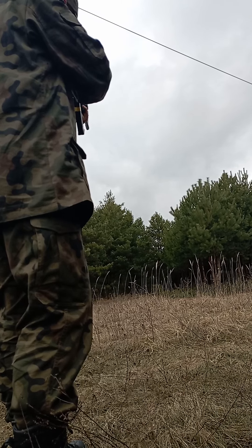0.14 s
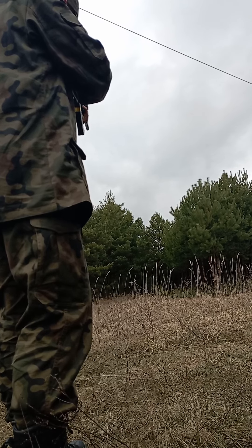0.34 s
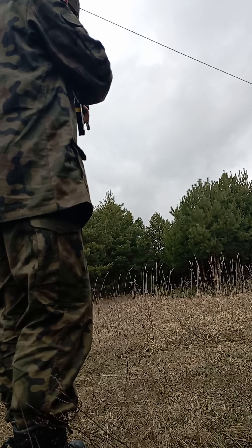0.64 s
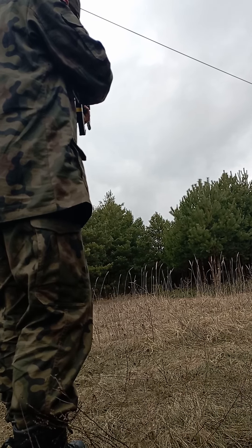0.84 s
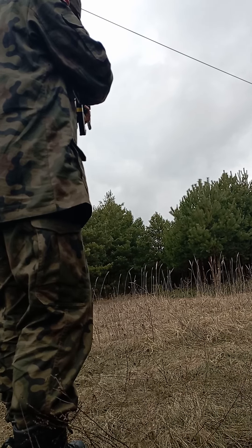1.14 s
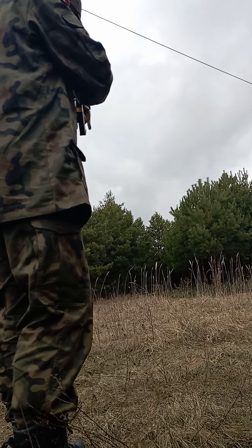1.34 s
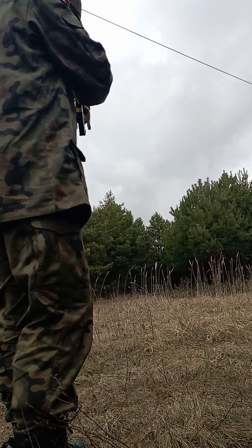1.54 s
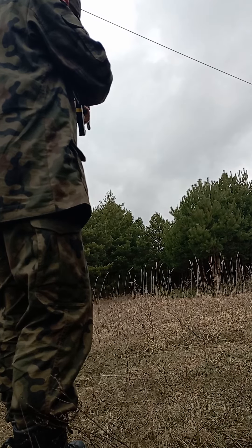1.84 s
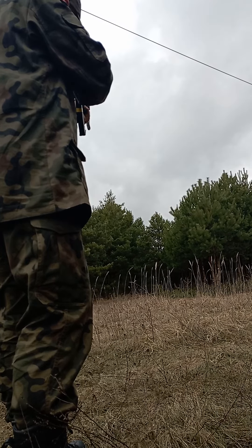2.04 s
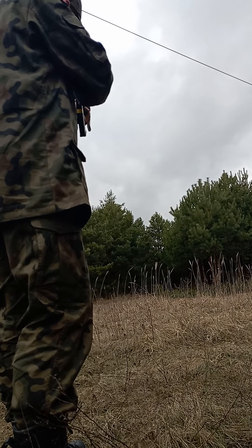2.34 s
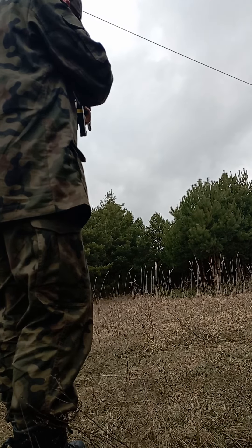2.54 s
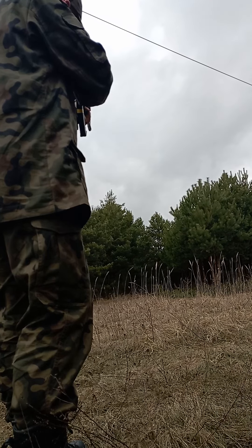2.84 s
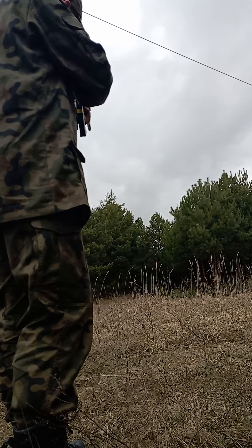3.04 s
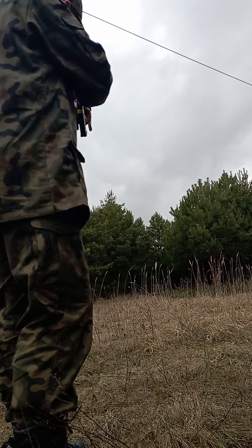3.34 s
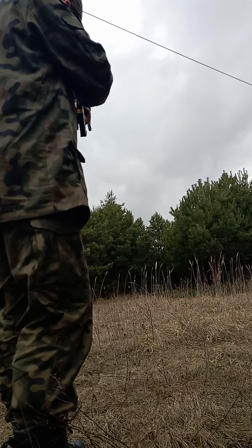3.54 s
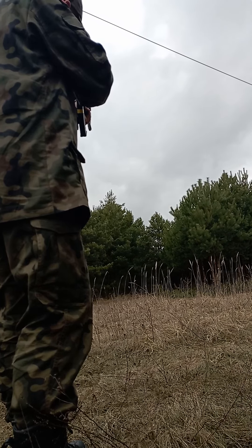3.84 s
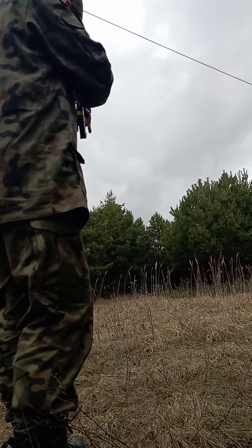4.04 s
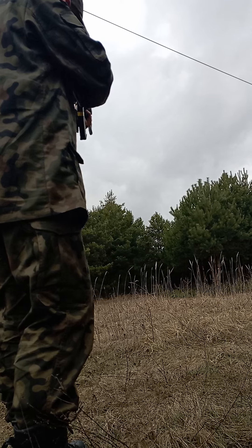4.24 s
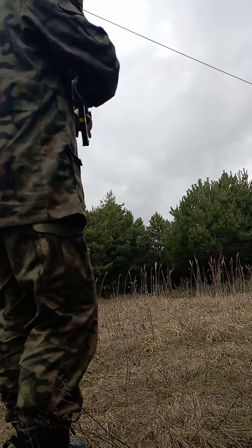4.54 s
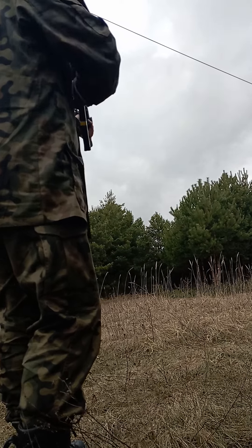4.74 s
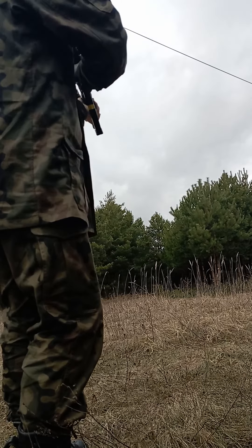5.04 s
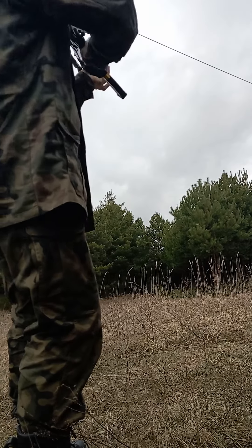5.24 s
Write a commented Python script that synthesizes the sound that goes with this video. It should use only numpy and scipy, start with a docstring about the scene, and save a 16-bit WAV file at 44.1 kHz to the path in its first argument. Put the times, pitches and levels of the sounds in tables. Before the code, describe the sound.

Outdoors in an open field, an electric airsoft rifle starts firing at once, about ten sharp snapping shots a second for four seconds, with hollow piston knocks, gear rattle and motor whine between them. It stops abruptly with a very short rundown. Then soft breeze, faint cloth rustle, tiny gear ticks and two dull boot thuds. Close stereo phone microphone on the shooter's side.

```python
"""In an open field an electric airsoft rifle fires one long burst, ten shots a second, heard from the shooter's side.
Air cracks and jets from the muzzle as filtered clicks and short noise; piston blows set the body ringing.
Random tooth clicks, a drone and a whine follow the spring load, then the motor runs down.
Shaped noise makes the breeze, far rumble, cloth and small ticks of kit; soft low rings are boots shifting.
Two phone microphone ports, each with its own colour, pick it all up."""
import sys
import numpy as np
from scipy import signal
from scipy.fft import rfft, irfft, next_fast_len
from scipy.io import wavfile

SR = 44100
rng = np.random.default_rng(int(sys.argv[2]) if len(sys.argv) > 2 else 0)


def unload_wav(signal):
    """Save mono or channel-first audio to the path in sys.argv[1] as 16-bit WAV at rate SR, clipped to [-1, 1]."""
    wavfile.write(
        sys.argv[1],
        SR,
        np.round(np.clip(np.atleast_2d(signal).T, -1, 1) * 32767).astype(np.int16),
    )


N = 238111
TIME = np.arange(N) / SR   # s

# The shots of the burst: t/s, relative level/dB
SHOTS = [(0.0179, -1.4), (0.1256, -2.9), (0.2251, -5.0), (0.3241, -3.9), (0.4226, -3.9), (0.5209, -3.2),
         (0.6195, -2.9), (0.718, -4.6), (0.8169, -5.2), (0.9161, -3.3), (1.0154, -3.7), (1.115, -2.4),
         (1.2146, -2.6), (1.3145, -2.1), (1.4147, -3.4), (1.515, -1.9), (1.6156, -2.5), (1.7163, -2.1),
         (1.8177, -4.3), (1.919, -2.8), (2.0202, -2.6), (2.1215, -2.2), (2.2226, -2.9), (2.3238, -3.8),
         (2.4243, -5.2), (2.5253, -2.5), (2.6264, -4.4), (2.7272, -2.5), (2.8292, -3.0), (2.931, -2.4),
         (3.0325, -2.5), (3.1341, -2.7), (3.2359, -2.6), (3.3377, -2.1), (3.4392, -3.1), (3.5408, -2.8),
         (3.6426, -3.8), (3.7439, -3.2), (3.8461, -3.9), (3.95, -3.8)]
# Tone of fine cloth hiss and kit ticks: f/Hz, relative level/dB
FINE_COLOUR = [(4000, -32), (6000, -5), (8000, -4), (10000, 0), (11500, -8.5), (14500, -13), (16000, -31.5)]
RIGHT_LAG = 8   # samples by which gearbox sound reaches the right port later


def amp(db):
    """Turns decibels into a plain multiplier."""
    return 10 ** (np.asarray(db) / 20)


def rms_one(x):
    """Scales a sound to an average (rms) strength of 1."""
    return x / np.sqrt(np.mean(x ** 2) + 1e-20)


def clicks(times, gains):
    """Clicks at exact times, even between samples: each is a short, smoothly ended sinc pulse."""
    at = np.ravel(times)[:, None] * SR
    index = np.floor(at).astype(int) + np.arange(-12, 13)
    offset = index - at
    taps = np.sinc(offset) * np.cos(np.pi * offset / 27) ** 2
    out = np.full(N, 1e-18)   # not quite zero, which keeps later filters fast
    inside = (index >= 0) & (index < N)
    np.add.at(out, index[inside], (taps * np.ravel(gains)[:, None])[inside])
    return out


def ring(x, hz, t60):
    """A resonance: a unit click starts a sine of height 1 that dies by 60 dB in t60 seconds."""
    r, w = amp(-60 / (t60 * SR)), 2 * np.pi * hz / SR
    return signal.lfilter([0, np.sin(w)], [1, -2 * r * np.cos(w), r * r], x)


def coloured(x, spectrum):
    """Shapes the tone of a steady sound by a curve of f/Hz, level/dB, then sets its rms to 1."""
    size = next_fast_len(N)
    hz, db = np.transpose(spectrum)
    grid = np.log(np.arange(size // 2 + 1) * SR / size + 1)
    curve = amp(np.interp(grid, np.log(hz), db, left=-80))
    return rms_one(irfft(rfft(x, size) * curve, size)[..., :N])


def pair(alike):
    """Stereo noise: the ports share this part of its power and the rest differs."""
    a = np.clip(alike, 0, 1)
    shared, left, right = rng.standard_normal((3, N))
    return np.sqrt(a) * shared + np.sqrt(1 - a) * np.array([left, right])


def wobble(rate_hz):
    """Random wandering with rms 1, smoothed by a low-pass filter at rate_hz."""
    smooth = signal.butter(2, rate_hz, fs=SR, output="sos")
    return rms_one(signal.sosfilt(smooth, rng.standard_normal(N + SR))[SR:])   # drops the filter's start


def rough_line(hz, width_hz):
    """A rough tone: a narrow band of noise around a steady or moving pitch."""
    turn = 2 * np.pi * np.cumsum(hz * np.ones(N)) / SR
    return wobble(width_hz) * np.cos(turn) + wobble(width_hz) * np.sin(turn)


def lagged(x, count=RIGHT_LAG):
    """Makes two channels and delays the right one by count samples."""
    x = x * np.ones((2, 1))
    return np.array([x[0], np.roll(x[1], count)])


def port(x, peaks):
    """Colours one channel by boosting or cutting bands in turn: f/Hz, width/Hz, level/dB."""
    for hz, width, db in peaks:
        w, a = 2 * np.pi * hz / SR, amp(db / 2)
        k = np.sin(w) * width / hz / 2
        x = signal.lfilter([1 + k * a, -2 * np.cos(w), 1 - k * a], [1 + k / a, -2 * np.cos(w), 1 - k / a], x)
    return x


def muzzle_crack():
    """The sharp crack of escaping air reaches each port directly and off nearby surfaces."""
    # Arrival times around the shot, one row a path: left t/s, right t/s
    path_delays = [(-.0006, -.00052), (-.00021, -.00021), (-.0001, -.00006), (.00057, .0005),
                   (.00167, .0015), (.002, .0019), (.0197, .02)]
    # Strength of the same paths: left level/dB, right level/dB
    path_levels = [(-10, -16), (3.5, -10), (.5, 1), (-11, -16), (-1, -7), (-5, -14), (-22, -34)]
    s, db = np.transpose(SHOTS)
    delays, levels = np.transpose(path_delays), np.transpose(path_levels)
    vary_db = 1.0 * rng.standard_normal((len(s), len(path_delays)))
    cracks = [clicks(s[:, None] + delays[c], amp(db[:, None] + levels[c] + vary_db - 0.5)) for c in (0, 1)]
    band = signal.butter(2, [3720, 14500], "band", fs=SR, output="sos")   # Hz
    return signal.sosfilt(band, cracks)


def air_jet():
    """Air jets past the pellet: noise swells sharply at each crack, holds briefly and falls."""
    # Tone of the jet: f/Hz, relative level/dB
    jet_colour = [(800, -22), (1800, 3), (3000, 3), (5500, -15.5), (7000, 12.5), (8000, 8), (10000, 6.5),
                  (13000, -3), (17000, -10.5)]
    jet_db, start_s, end_s = -24, -0.003, 0.0012   # full level between these times from the crack
    rise_db_per_s, fall_db_per_s = 15989.5, 3996.5
    s, db = np.transpose(SHOTS)
    nearest = np.searchsorted((s[1:] + s[:-1]) / 2, TIME)
    since = TIME - s[nearest]
    rise_db = rise_db_per_s * np.maximum(start_s - since, 0)
    fall_db = fall_db_per_s * np.maximum(since - end_s, 0)
    gate = amp(jet_db + .5 * db[nearest] - rise_db - fall_db)   # jets vary half as much in dB as shots
    return lagged(gate * coloured(pair(alike=0.91), jet_colour), count=7)


def barrel():
    """The barrel's column of air rings like a blown pipe."""
    s, db = np.transpose(SHOTS)
    return ring(clicks(s - .0006, amp(db - 25)), 2186, 0.016)   # Hz, t60 s


def echo():
    """Grass and ground scatter treble back: each shot starts a dying tail of noise."""
    # Tone of the echo: f/Hz, relative level/dB
    echo_colour = [(2500, -32), (5500, -10), (7500, 3.5), (10000, 3), (13000, -5.5), (14800, -10),
                   (16000, -40)]
    echo_db, t60_s = -41, 0.29
    s = np.array(SHOTS)[:, 0]
    fired = np.zeros(N)
    fired[((s + .004) * SR).astype(int)] = 1
    power = signal.lfilter([1], [1, -amp(-120 / (t60_s * SR))], fired)   # overlapping tails add as power
    return amp(echo_db) * np.sqrt(power) * coloured(pair(alike=0.39), echo_colour)


def muzzle():
    """Crack and jet share a resonant tone towards each port; the echo and barrel ring join them."""
    # Muzzle resonances, a list for the left port and one for the right: f/Hz, width/Hz, level/dB
    muzzle_ring = [
        [(9870, 2900, 5), (6750, 940, 4)],
        [(6874, 630, 6), (10200, 2100, 3)],
    ]
    shot = air_jet() + muzzle_crack()
    return np.array([port(shot[c], muzzle_ring[c]) for c in (0, 1)]) + lagged(echo() + barrel())


def piston():
    """Release, flight, slam and pick-up ring the plastic body and shove the whole rifle."""
    # Blows in the gearbox: t/s from crack, knock direction, knock level/dB, shove direction, shove level/dB
    blows = [(-.0141, -1, -39, -1, -33.5), (-.0109, 1, -38.5, 1, -33.5), (-.0073, -1, -38, -1, -41.5),
             (-.0031, -1, -38, 1, -40), (.0016, 1, -28.5, -1, -46), (.0037, 1, -30, 1, -40),
             (.0245, 1, -43, 1, -60), (.040, 1, -44, 1, -58)]
    # Resonances of the body: f/Hz, level/dB added to the knock, t60/s
    body = [(339, -8.5, .029), (420, -8, .033), (517, -9.5, .035), (560, 0, .028), (890, -9.5, .021),
            (706, -17, .03), (1500, -16, .015), (2150, -14, .012)]
    s = np.array(SHOTS)[:, :1]
    delay, knock_sign, knock_db, shove_sign, shove_db = np.transpose(blows)
    fired = np.ones((len(s), len(delay)))
    fired[-1, delay > .02] = 0   # the trigger is let go: no pick-up after the last shot
    times = s + delay + .00008 * rng.standard_normal(fired.shape)
    out = ring(clicks(times, fired * shove_sign * amp(shove_db)), 85, .054)   # recoil: Hz, t60 s
    for hz, db, t60 in body:
        vary_db = 0.48 * rng.standard_normal(fired.shape)
        out += ring(clicks(times, fired * knock_sign * amp(knock_db + db + vary_db)), hz, t60)
    return lagged(out)


def tooth_rattle():
    """Gear teeth clatter: random clicks and noise, with one band that sings."""
    # Tone of the rattle: f/Hz, relative level/dB
    rattle_colour = [(700, -3.5), (1200, 0), (2000, -7), (3000, 6), (4500, 5), (6000, 0.5), (8500, 1),
                     (11000, -4), (12200, -3), (14800, -11.5), (16000, -42.5)]
    # Extra treble at the left port, which faces the gearbox: f/Hz, width/Hz, level/dB
    left_treble = [(8700, 6800, 3)]
    hits = rng.random(N) < 2500 / SR   # average hits per second
    hit_db = 1.6 * np.minimum(rng.exponential(1, N), 4)
    teeth = hits * amp(hit_db) * rng.choice([-1, 1], N)
    rattle = coloured(rms_one(teeth) + 1.55 * pair(alike=0.13), rattle_colour)
    rattle = np.array([port(rattle[0], left_treble), rattle[1]])
    return rattle + amp(-10) * rough_line(4620, 110)


def gearbox_drone():
    """Low noise with rough tones where the gearbox shell resonates."""
    # Tone of the drone: f/Hz, relative level/dB
    drone_colour = [(40, -31), (110, -2), (250, -20.5), (400, -10.5), (520, -2.5), (680, -10), (950, -15),
                    (1300, -12), (2200, -12.5), (4000, -45)]
    # Shell resonances: f/Hz, width/Hz, level/dB over the drone
    hums = [(442, 34, -8), (562, 25, -7), (950, 47, -9)]
    drone = coloured(pair(alike=1.0), drone_colour)
    return drone + sum(amp(db) * rough_line(hz, width) for hz, width, db in hums)


def gear_whine(load):
    """Pairs of gears whine together; a loaded spring slows them and lowers the pitch."""
    # Gear pairs: multiple of the whine's pitch, level/dB
    whine_orders = [(1, -3), (1.549, -11), (2.299, -11)]
    free_hz, sag_hz, sag_bend = 1976, 433.4, 1.5   # unloaded pitch, its drop towards full load, bend of the drop
    lag_s, width_hz = .004, 160   # the motor answers the load a little late
    r = np.exp(-1 / (lag_s * SR))
    whine_hz = free_hz - sag_hz * signal.lfilter([1 - r], [1, -r], load ** sag_bend)
    return sum(amp(db) * rough_line(k * whine_hz, k * width_hz) for k, db in whine_orders)


def gears():
    """The spring's load, the catch and the release steer rattle, drone and whine until the gears coast and stop."""
    pick_up, let_go = .24, .87   # shares of the cycle after the crack at which the gear catches and frees the piston
    s = np.array(SHOTS)[:, 0]
    cycle_times = np.r_[2 * s[0] - s[1], s, 2 * s[-1] - s[-2]]
    share = np.interp(TIME, cycle_times, np.arange(len(s) + 2)) % 1
    period = np.mean(np.diff(s))
    after = TIME - s[-1]
    pulling = (share > pick_up) & (share < let_go) & (after < 0)
    load = pulling * (share - pick_up) / (let_go - pick_up)
    # the teeth clatter as they catch the piston: 4 dB more, fading over about 2.6 ms
    catch_db = 4 * pulling * np.exp(-np.abs(share - pick_up) * period / 0.0026)
    # the rattle changes with load, while free, and while the piston flies
    rattle_db = -40.5 - 5 * load + catch_db - 1.5 * ~pulling - 6 * (share > let_go)
    drone_db = -48 - 2.5 * load
    whine_db = -54 + 7 * np.minimum(load / .4, 1) + catch_db   # full gain from 0.4 of full load
    # after the last shot the gears coast for 0.11 s, then stop: dB per second
    slowing_db = -47 * after - 245 * np.maximum(after - .11, 0)
    rattle_db = np.where(after > 0, -47 + slowing_db, rattle_db)
    drone_db = np.where(after > 0, -51.5 + slowing_db, drone_db)
    whine_db = np.where(after > 0, -64 + slowing_db, whine_db)
    rattle = amp(rattle_db + 2.26 * wobble(60)) * tooth_rattle()
    return lagged(rattle + amp(drone_db) * gearbox_drone() + amp(whine_db) * gear_whine(load))


def kit_ticks():
    """Bits of kit tick: each tick is a brief burst of bright hiss, with fainter ones at random."""
    # Single ticks: t/s, level/dB, left over right/dB
    kit = [(4.3296, -60, -0.5), (4.3424, -60, -6), (4.3545, -58, 4.5), (4.3614, -57, 0.5),
           (4.3774, -63, -1.0), (4.3984, -63, 0.5), (4.4418, -60, -2.0), (4.4997, -67, -1.0),
           (4.581, -53, 2), (4.6488, -61, 0.5), (4.7084, -62, -2.0), (4.7671, -58, -1.0),
           (4.999, -60.5, 0.5), (5.0274, -71, 0.0), (5.2689, -50, 1.0), (5.3165, -41.5, 2),
           (5.3507, -46, 0.0)]
    s, db, pan = np.transpose(kit)
    chance = (rng.random(N) < 18 / SR) * (TIME > 4.2)   # average per second; from 4.2 s on
    small = chance * amp(-69 + 3.0 * rng.standard_normal(N))
    taps = [clicks(s, amp(db + side * pan / 2)) + small for side in (1, -1)]
    fading = signal.lfilter([1], [1, -amp(-60 / (0.0058 * SR))], taps)   # t60 5.8 ms
    return fading * coloured(pair(alike=0.3), FINE_COLOUR)


def cloth():
    """Sleeves rub: each rub swells and fades as a fine hiss and a coarse rasp, with stiff fibres snapping."""
    # Rubs: peak t/s, hiss level/dB, rasp level/dB, swell/(dB/s), fade/(dB/s), both for the hiss
    rubs = [(4.36, -76, -80, 330, 170), (4.61, -68, -69, 150, 500), (5.35, -62, -66, 80, 70)]
    # Tone of the coarse rasp: f/Hz, relative level/dB
    rasp_colour = [(1200, -23), (2500, -7), (3800, 4), (4800, -3), (6000, -17), (8000, -31.5)]
    s, fine_db, rasp_db, swell, fade = np.transpose(rubs)[:, :, None]
    shape_db = -np.maximum((s - TIME) * swell, (TIME - s) * fade)
    snaps = rng.random(N) < 400 / SR   # average per second
    crackle = rms_one(snaps * rng.standard_normal(N))
    # the first levels remain between rubs: cloth never lies quite still
    fine = amp(-84.5) + amp(fine_db + shape_db).sum(axis=0)
    rasp = amp(-87) + amp(rasp_db + shape_db / 1.5).sum(axis=0)   # the rasp changes 1.5 times as slowly
    out = 0
    for level, colour in ((fine, FINE_COLOUR), (rasp, rasp_colour)):
        flutter = amp(1.8 * wobble(40))
        out = out + level * flutter * coloured(pair(alike=0.078) + .6 * crackle, colour)
    return (TIME > SHOTS[-1][0]) * out   # only after the last shot


def boot_thuds():
    """Boots shift: soft low thuds that ring briefly."""
    # Thuds: t/s, level/dB
    thuds = [(4.969, -39.5), (5.055, -43.5)]
    s, db = np.transpose(thuds)
    return ring(clicks(s, amp(db)), 90, 0.067)


def breeze():
    """Gusty air and far rumble: noise that the two ports share mostly in the bass."""
    # Tone of the air: f/Hz, relative level/dB
    air_colour = [(18, -47.5), (30, -14.5), (81, -7.5), (109, -4.5), (184, -8), (311, -12), (355, -12.5),
                  (540, -20), (684, -19.5), (801, -23.5), (1100, -23.5), (2170, -32.5), (2750, -37.5),
                  (16000, -63.5)]
    # Gusts: t/s, level/dB
    gusts = [(0, -59), (4.2, -58), (4.6, -56.5), (4.85, -59), (5.15, -56.5), (5.4, -56.5)]
    low = signal.butter(1, 900, fs=SR, output="sos")
    near, apart = pair(alike=0.88), pair(alike=0)
    noise = signal.sosfilt(low, near - apart) + apart   # the shared noise takes over in the bass
    gust_db = np.interp(TIME, *np.transpose(gusts)) + 0.99 * wobble(4.2)
    return coloured(noise, air_colour) * amp(gust_db)


def scene():
    """All sources add up at the two ports."""
    return muzzle() + piston() + gears() + kit_ticks() + cloth() + boot_thuds() + breeze()


def record(dry):
    """Each port colours the sound and hisses faintly; rumble and top are cut."""
    # Colour of each port, facing a different way: f/Hz, width/Hz, level/dB
    left_port = [(2146, 120, -17.5), (4600, 3000, -4), (8800, 19000, 1), (100, 64, -4), (520, 37, -0.5)]
    right_port = [(1500, 500, -4.5), (2200, 500, 3), (11000, 4000, -3), (560, 300, 2), (7400, 2500, 3)]
    x = np.array([port(dry[0], left_port), port(dry[1], right_port)])
    hiss = coloured(pair(alike=0), [(1000, -5.5), (14500, -8.0), (16000, -14.5)])   # f/Hz, relative level/dB
    x = x + amp(-82.5) * hiss
    x = signal.sosfilt(signal.butter(5, 58, "high", fs=SR, output="sos"), x)
    return signal.sosfilt(signal.cheby2(16, 100, 17200, fs=SR, output="sos"), x)


dry = scene()
out = record(dry)
unload_wav(out)
```